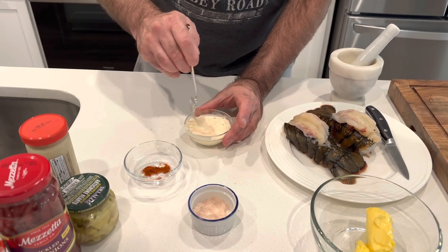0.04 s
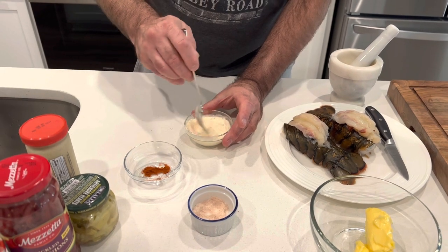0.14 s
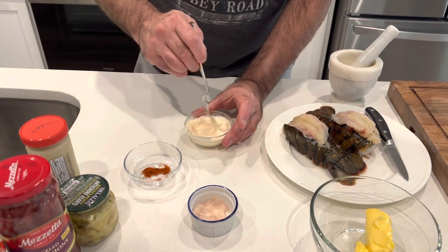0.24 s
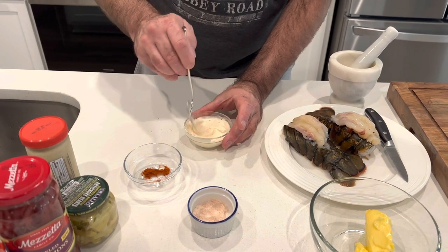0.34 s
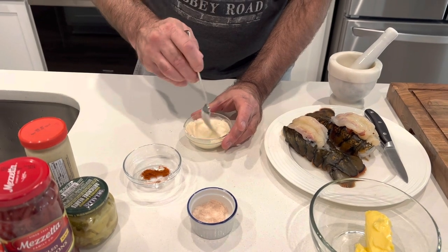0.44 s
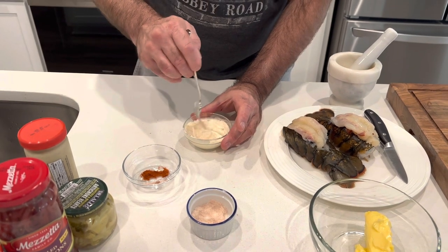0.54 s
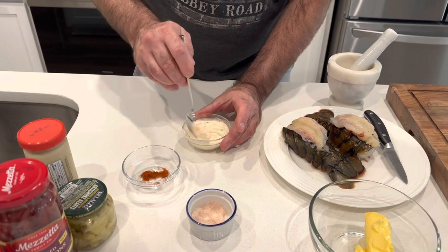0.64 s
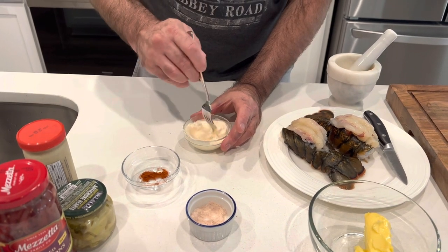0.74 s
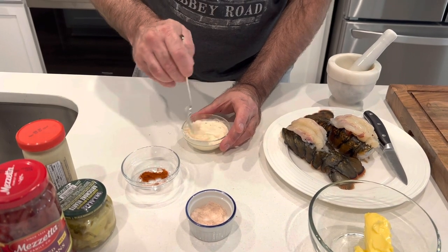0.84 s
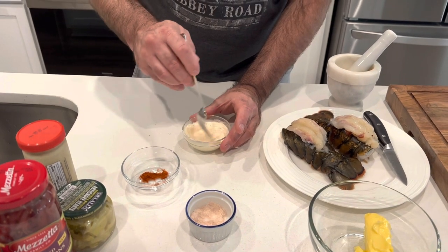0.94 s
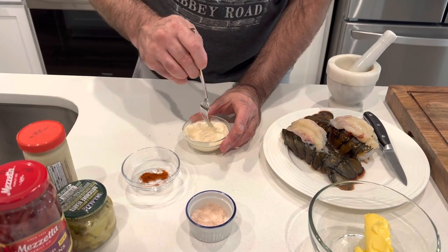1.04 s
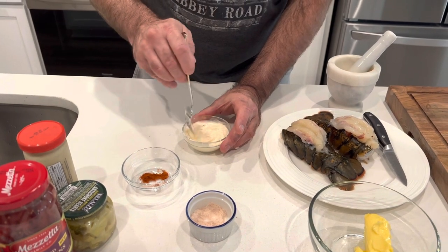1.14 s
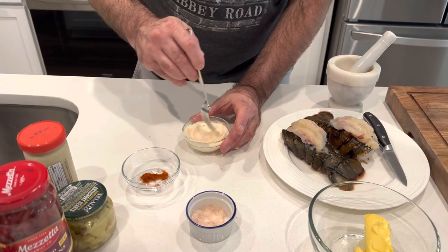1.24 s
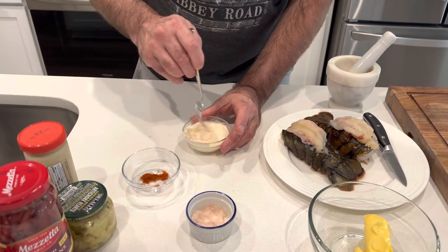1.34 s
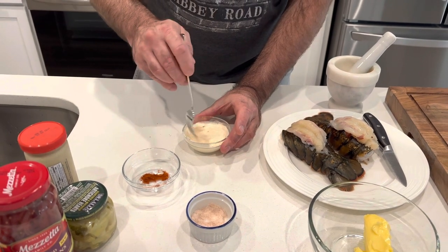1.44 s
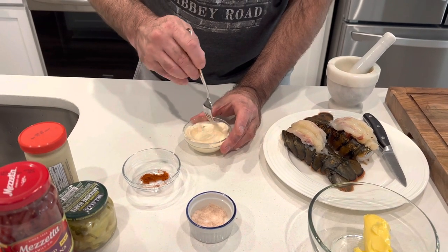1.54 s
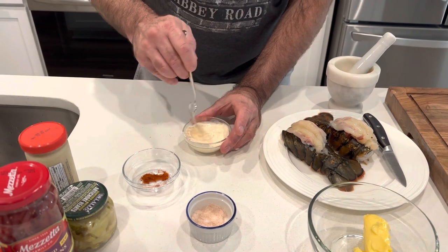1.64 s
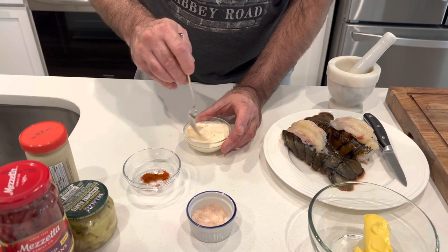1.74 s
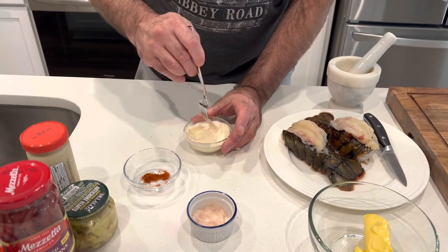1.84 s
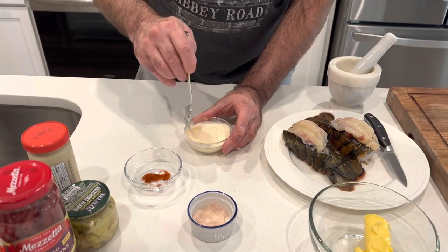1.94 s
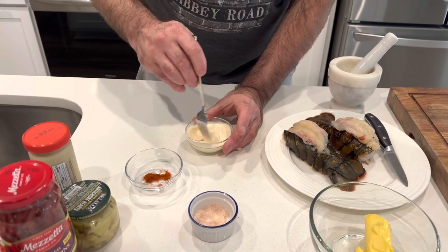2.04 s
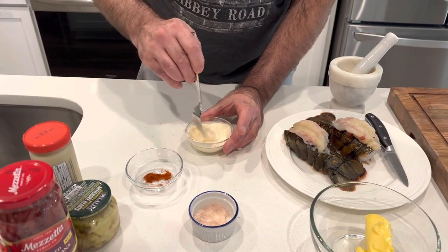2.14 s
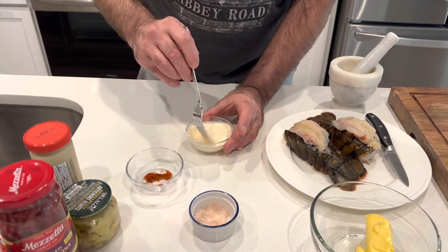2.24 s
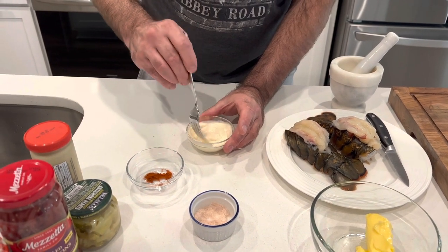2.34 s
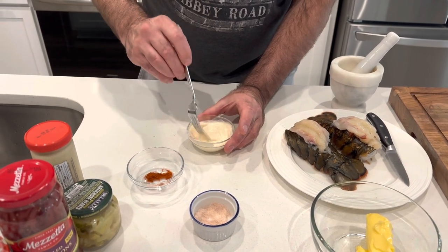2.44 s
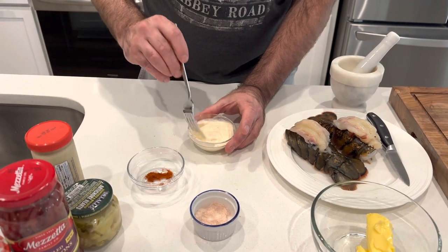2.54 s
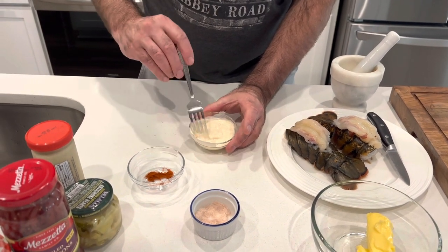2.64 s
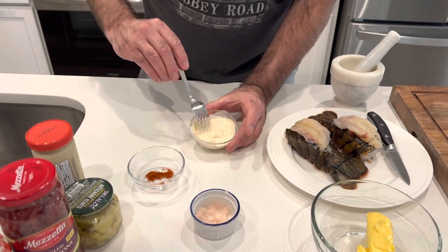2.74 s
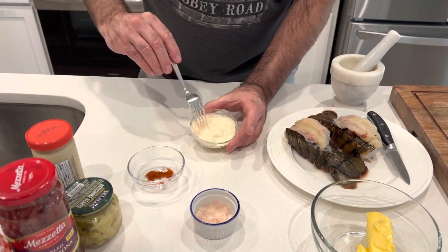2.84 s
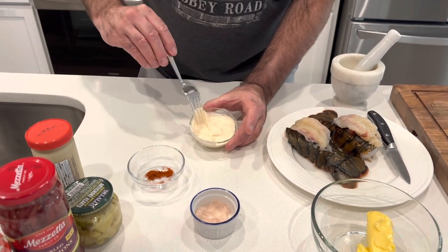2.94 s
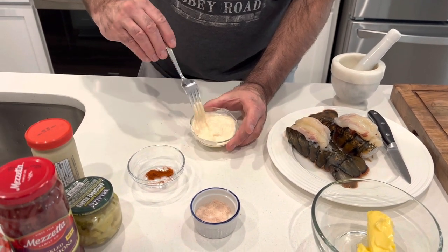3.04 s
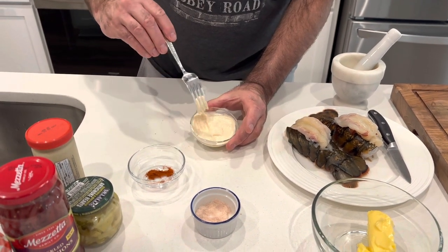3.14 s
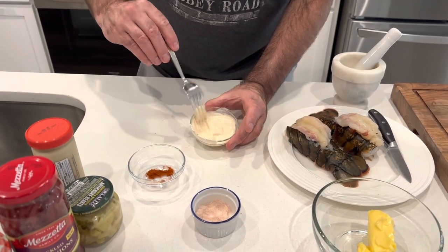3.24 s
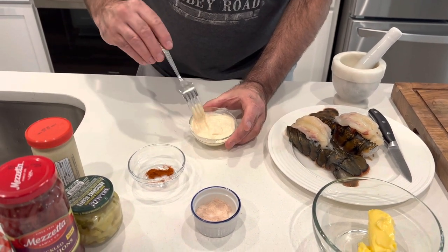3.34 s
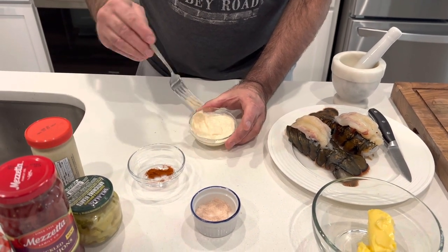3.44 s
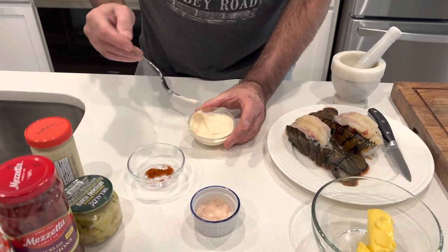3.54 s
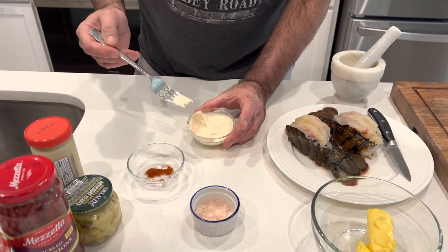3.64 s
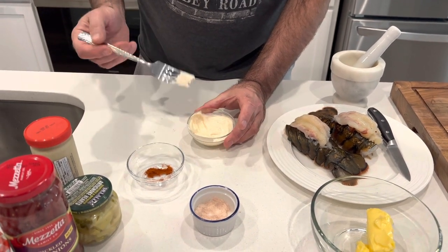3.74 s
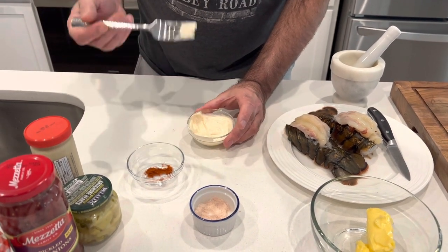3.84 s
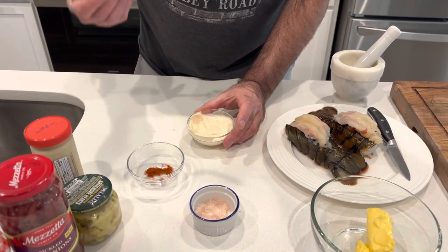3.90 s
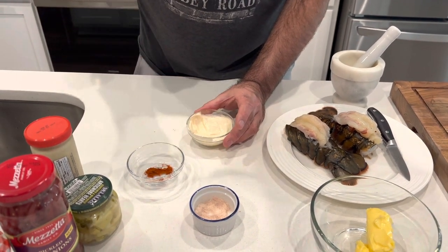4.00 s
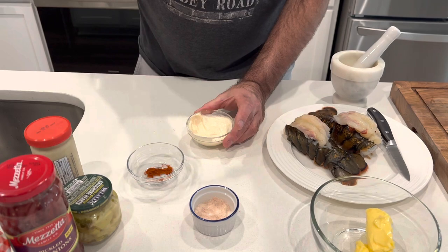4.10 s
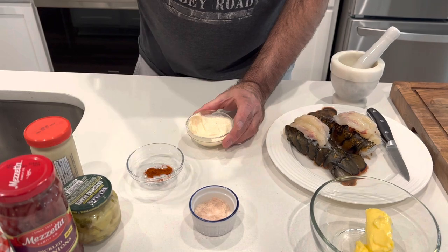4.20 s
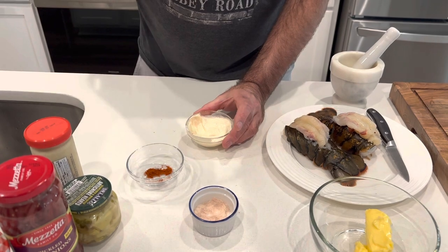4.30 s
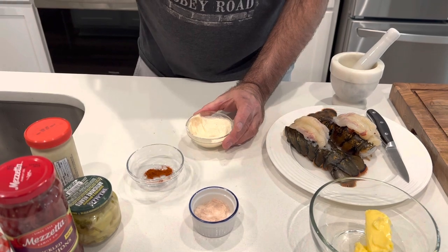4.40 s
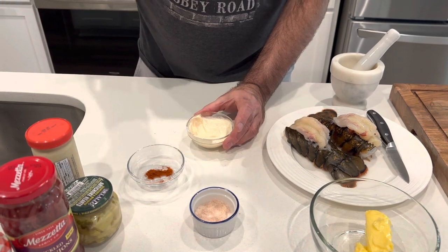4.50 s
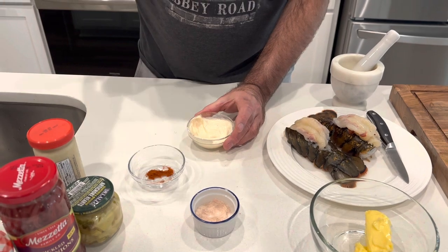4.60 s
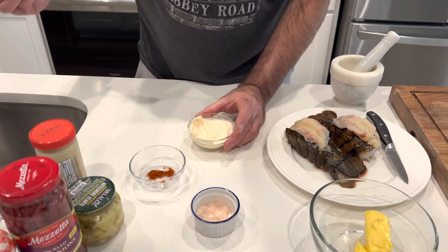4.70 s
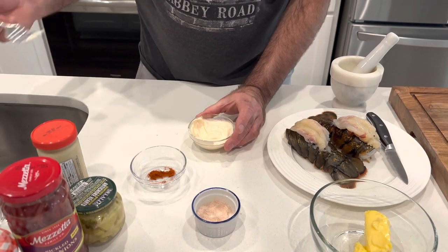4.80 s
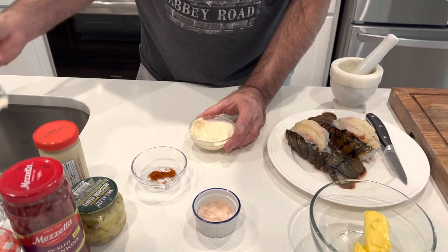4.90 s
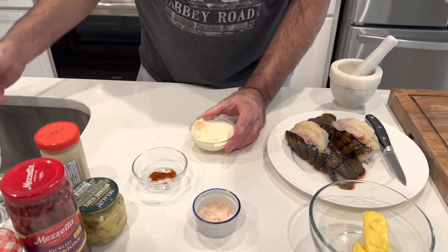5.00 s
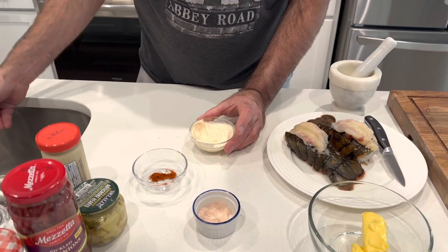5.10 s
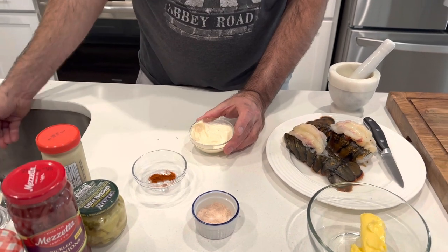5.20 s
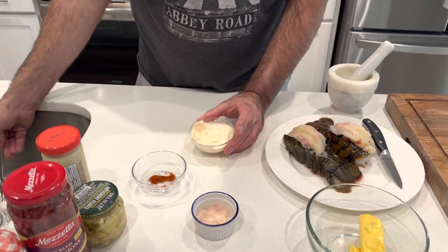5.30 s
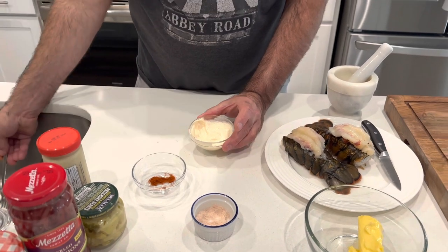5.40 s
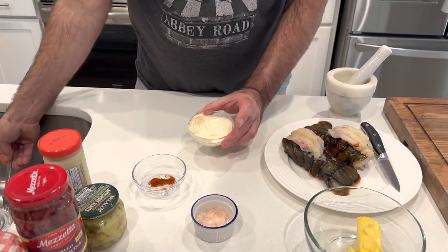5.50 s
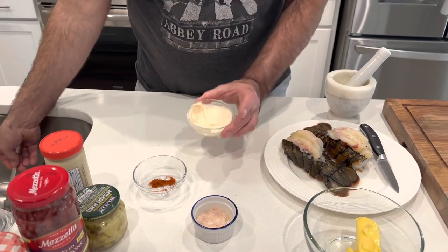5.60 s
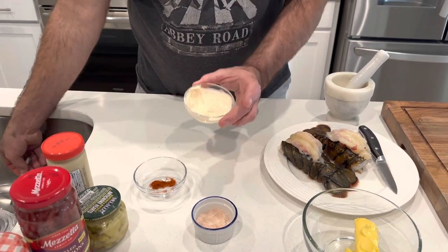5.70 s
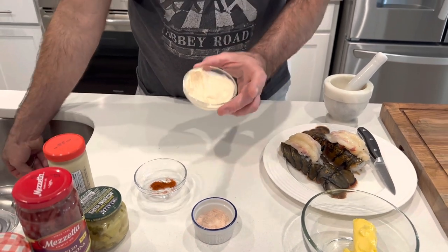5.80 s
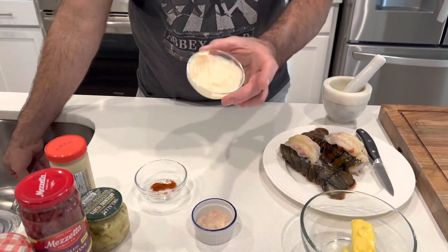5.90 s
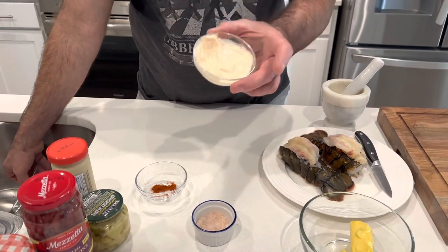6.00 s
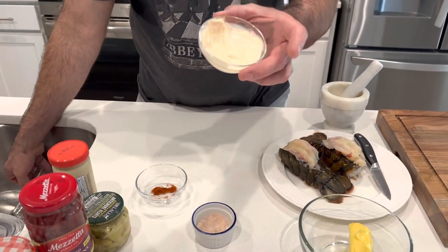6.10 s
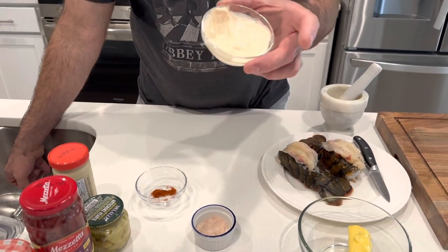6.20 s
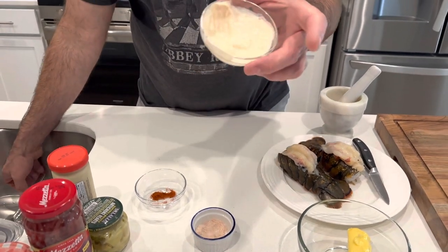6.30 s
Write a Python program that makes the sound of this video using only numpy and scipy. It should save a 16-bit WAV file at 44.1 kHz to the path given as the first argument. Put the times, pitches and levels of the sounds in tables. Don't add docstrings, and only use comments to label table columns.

```python
import sys
import numpy as np
from scipy import signal
from scipy.io import wavfile

SR = 44100
rng = np.random.default_rng(int(sys.argv[2]) if len(sys.argv) > 2 else 0)


def boost(x):
    u = np.asarray(x, float) / 20
    return 10 ** u


def wav_record(signal):
    frames = np.transpose(np.atleast_2d(signal))
    bounded = np.clip(frames, -1, 1)
    quanta = np.round(bounded * 32767).astype(np.int16)
    wavfile.write(sys.argv[1], SR, quanta)


N = 280035
LEAD = 4410
SPAN = N + LEAD
TIME_S = (np.arange(SPAN) - LEAD) / SR

# f/Hz, level/dB per Hz
TICK_COLOUR = [(2120, -31.5), (3600, -11), (4120, -1.5), (7030, -1.5), (7780, -4), (8400, -6), (9180, -4),
               (10400, -18.5), (15600, -18), (16500, -23)]


def rms_one(x):
    return x / np.sqrt(np.mean(x ** 2) + 1e-20)


def level_curve(rows):
    s, db = np.transpose(rows)
    return boost(np.interp(TIME_S, s, db, left=-120, right=-120))


def at_hz(points, hz, column=1):
    points = np.array(points)
    return np.interp(np.log(hz), np.log(points[:, 0]), points[:, column])


def clicks(s, db):
    out = np.full(SPAN, 1e-18)
    np.add.at(out, (np.asarray(s) * SR).round().astype(int) + LEAD, boost(db))
    return out


def ring(force, hz, t60):
    r, w = boost(-60 / (t60 * SR)), 2 * np.pi * hz / SR
    return signal.lfilter([0, np.sin(w)], [1, -2 * r * np.cos(w), r * r], force)


def strike(s, db, modes, spread_db):
    luck = rng.standard_normal((len(s), len(modes)))
    out = 0
    for k, (hz, mode_db, t60) in enumerate(modes):
        force = clicks(s, db(hz) + mode_db + spread_db * luck[:, k])
        out = out + (-1) ** k * ring(force, hz, t60)
    return out


def grains(per_s, spread_db):
    sizes = boost(spread_db * np.minimum(rng.exponential(1, SPAN), 4)) * rng.choice([-1, 1], SPAN)
    return rms_one(sizes * (rng.random(SPAN) < per_s / SR))


def bands(white, low_hz=0):
    edges_hz = 25 * 2 ** np.arange(0, 9.6, .5)
    for k, (low, high) in enumerate(zip(edges_hz, edges_hz[1:])):
        if low > low_hz:
            sos = signal.butter(2, [low, high], "band", fs=SR, output="sos")
            yield np.sqrt(low * high), signal.sosfilt(sos, white[k % 2])


def stereo(mid, side, likeness):
    likeness = np.clip(likeness, 0, 1)
    return np.sqrt(1 + likeness) * mid + np.sqrt(1 - likeness) * side * [[1], [-1]]


def bursts(s, db, t60, rise_hz):
    fade = signal.lfilter([1], [1, -boost(-60 / (t60 * SR))], clicks(s, db))
    swell = np.exp(-2 * np.pi * rise_hz / SR)
    return signal.lfilter([1 - swell], [1, -swell], fade) * rng.standard_normal((2, SPAN))


def colour(pair, spectrum, gain=lambda hz: 1):
    return sum(boost(at_hz(spectrum, hz)) * band * gain(hz) for hz, band in bands(pair, low_hz=300))


def held(s, db):
    latest = np.searchsorted(s, TIME_S + 40 / SR) - 1
    return boost(db)[np.maximum(latest, 0)]


def flutter(rate_hz, depth_db):
    sos = signal.butter(2, rate_hz, fs=SR, output="sos")
    return boost(depth_db * rms_one(signal.sosfilt(sos, rng.standard_normal(SPAN))))


def deaf_band(x):
    return signal.sosfilt(signal.butter(4, [10200, 13200], "bandstop", fs=SR, output="sos"), x)


def strokes():
    # t/s, tick/dB, knock/dB, glance/dB (how far a slanting blow spares deep and high modes), thump/dB
    stroke_rows = [(0.2037, -32, -35.5, 4, -51), (0.2182, -23, -24.5, 10.5, -48.5),
                   (0.399, -31, -41.5, 20, -58.5), (0.4843, -23, -23.5, 3, -46),
                   (0.6538, -32.5, -49, 22, -58), (0.7458, -26.5, -27, 5, -51), (0.928, -34, -45, 9, -56.5),
                   (1.0021, -22.5, -26, -1.5, -52.5), (1.0854, -63, -65, -6, -69),
                   (1.2785, -19, -23.5, 2.5, -52.5), (1.5454, -18, -23.5, 2, -51.5),
                   (1.7152, -51.5, -58, 13, -98), (1.8272, -22.5, -21, 0.5, -46.5),
                   (1.9996, -35, -42, 22, -50.5), (2.0997, -45, -57, 16, -54.5),
                   (2.2433, -81.5, -59.5, -1, -68), (2.3107, -30, -35.5, 15, -43),
                   (2.4897, -28, -39.5, -5.5, -49.5), (2.6645, -39.5, -52, -4.5, -59.5),
                   (2.8714, -36, -60.5, 3, -70), (2.9022, -41.5, -54.5, 11, -70.5),
                   (3.2668, -16.5, -39.5, -10, -57)]
    # tick/dB, knock/dB, glance/dB, thump/dB
    earlier_row = (-20.5, -26.5, 8, -42.5)
    # f/Hz, level/dB, t60/s
    bowl_modes = [(682.6, -5.5, 0.017), (778.3, 1.5, 0.053), (890, -5.5, 0.041), (1088.6, 4.5, 0.017),
                  (1080, 1, 0.028), (1284, -4.5, 0.054), (1432, -4, 0.018), (1422, -1, 0.066),
                  (1790, -0.5, 0.017), (1868, 0.5, 0.032), (2140, 4.5, 0.026), (2118, -4.5, 0.025),
                  (2603, -5, 0.054), (3146, -20, 0.0017)]
    # f/Hz, level/dB, t60/s
    bright_modes = [(4540, 0, 0.012), (6453, -11, 0.039), (8080, -6, 0.026), (9050, 3.5, 0.0047),
                    (15600, -17, 0.014)]
    # f/Hz, level/dB, t60/s
    counter_modes = [(130, 1.5, 0.045), (199.7, 3.5, 0.036), (255.5, 2.5, 0.054), (394.3, -10, 0.065),
                     (515, -5, 0.03)]
    # f/Hz, level/dB per Hz
    knock_colour = [(380, -36), (650, -6.5), (1180, 4), (1510, -6.5), (1930, 5), (3580, -15), (4450, -20.5),
                    (4800, -25.5), (6240, -60), (10600, -120)]

    s, tick_db, middle_db, glance_db, thump_db = np.transpose([(-.06, *earlier_row)] + list(stroke_rows))
    knock_db = [middle_db - 0.15 - glance_db, middle_db, middle_db + 2 - 0.44 * glance_db]
    register = lambda hz: int(hz > 1250) + int(hz > 2300)

    tick = colour(bursts(s, tick_db + 11.0, t60=0.0056, rise_hz=310), TICK_COLOUR)
    bright_rings = strike(s, lambda hz: tick_db - 6.5, bright_modes, spread_db=0.0)

    bowl = strike(s + 0.002555, lambda hz: knock_db[register(hz)] - 11.0, bowl_modes, spread_db=4.0)
    bowl = np.convolve(bowl, np.hanning(11) / 3)[:SPAN]

    force = [held(s, db) for db in knock_db]
    blow = clicks(s + 0.001986, 28 + 0 * s) * [[1], [-1]]
    puff = bursts(s + 0.0014, 6 + 0 * s, t60=0.049, rise_hz=200)
    clack = colour(blow + puff, knock_colour, lambda hz: force[register(hz)])

    thump = strike(s + 0.0057, lambda hz: thump_db + 0.5, counter_modes, spread_db=-1.0)
    return tick + bright_rings + bowl + clack + thump


def drag():
    # t/s, length/s, level/dB, fade/(dB/s)
    drag_rows = [
        (0.0, 2.08, -69, -2.3),
        (2.015, 0.82, -72, 7),
        (2.892, 0.19, -69, 33),
        (3.686, 0.29, -79.5, 32),
        (4.641, 0.41, -89.5, 9),
    ]
    # f/Hz, level/dB per Hz
    drag_colour = [(290, -41), (500, -7), (2230, -1.5), (3290, -15), (8210, -18), (10700, -37.5),
                   (11300, -55.5), (14700, -31), (16000, -43)]
    edge_s, turn_s, turn_db, turn_peak_s = 0.027, 0.24, 2, 1.51

    level = 0
    for s, length_s, db, fade in drag_rows:
        end_s, end_db = s + length_s, db - fade * length_s
        level = level + level_curve([(s - edge_s, db - 14), (s, db),
                                     (end_s, end_db), (end_s + edge_s, end_db - 17)])
    turn = boost(turn_db * np.cos(2 * np.pi * (TIME_S - turn_peak_s) / turn_s))
    wet = colour([grains(1000, spread_db=1.0), grains(1500, spread_db=6.5)], drag_colour)
    return level * turn * rms_one(deaf_band(wet))


def hum():
    # f/Hz, level/dB per Hz
    hum_colour = [(15, -49), (25, -15.5), (40, -15.5), (80, -4), (117, -3), (236, -19), (373, -22),
                  (591, -31), (659, -29.5), (714, -42.5), (1560, -38), (2000, -47.5), (5280, -50),
                  (14800, -62), (16000, -67.5)]
    # f/Hz, left-right likeness/1
    hum_likeness = [(60, 1), (240, 0.75), (950, 0.13), (3770, 0.041), (15000, 0.17)]
    out = 0
    for hz, (mid, side) in bands(rng.standard_normal((2, 2, SPAN))):
        out = out + boost(at_hz(hum_colour, hz)) * stereo(mid, side, at_hz(hum_likeness, hz))
    return boost(-57.5) * rms_one(out)


def smacks():
    # t/s, peak/dB, f/Hz, brightness/dB
    smack_rows = [(2.5073, -28, 1854, -13), (2.666, -42.5, 4330, -30), (2.873, -43.5, 1006, -24),
                  (2.903, -45.5, 1780, -29.5), (3.0234, -60, 1850, 9.5), (3.7267, -59.5, 1270, -33.5),
                  (3.7473, -53, 1460, -32.5), (3.74, -60, 2180, -20), (3.79, -57.5, 1500, -20),
                  (3.80, -65, 2200, -18), (3.7734, -59, 1294, -25.5), (3.8182, -57.5, 1550, -17),
                  (3.8414, -67.5, 1547, 2.5), (3.9194, -54, 1240, -7.5), (3.9715, -53.5, 1478, -32),
                  (4.0907, -65.5, 1370, -25), (4.313, -62, 1280, -26), (4.496, -68, 5100, -9.5),
                  (4.6424, -68.5, 2150, -19), (4.7044, -61.5, 2140, -28), (4.7167, -59, 2100, -22.5),
                  (4.72, -62, 1320, -18.5), (4.7845, -61, 2130, -14), (4.8, -62.5, 2700, -15),
                  (4.8194, -69, 2420, -6.5), (4.9307, -61.5, 5100, 7), (5.3342, -60, 2650, -24),
                  (5.3553, -59, 1670, -7)]
    pops = 0
    for s, peak_db, hz, _ in smack_rows:
        pops = pops + ring(clicks([s, s + 0.0059], [peak_db + 0.5, peak_db - 12.5]), hz, 0.017)
    s, peak_db, _, bright_db = np.transpose(smack_rows)
    crack = bursts(s, peak_db + bright_db + 12.5, t60=0.0065, rise_hz=404)
    return pops + colour(crack, TICK_COLOUR)


def rim_tap():
    # f/Hz, level/dB, t60/s
    rim_modes = [(793, -8, 0.014), (1135, -8, .02), (1650, -3, 0.0082), (2275, 0.5, 0.024),
                 (2480, -2.5, .02), (3130, 0, 0.0088), (3270, -8, .012), (4000, 3, .025), (6130, -3, 0.024),
                 (6820, -5.5, .02), (7900, 10, 0.021), (8770, 3, 0.014), (9020, -7.5, 0.016)]
    tap_s, tap_db = 3.2685, -31
    return sum((-1) ** k * ring(clicks([tap_s], [tap_db + db]), hz, t60)
               for k, (hz, db, t60) in enumerate(rim_modes))


def sink():
    # t/s, peak/dB, basin boom/dB, brightness/dB, low sheet modes/dB
    drop_rows = [(5.441, -39, -49, -18, -2.5), (5.4878, -30, -59, -40, -5), (5.5185, -50, -48, -8.5, 2),
                 (5.6558, -44, -67, -19, -4), (5.676, -51.5, -87, -4.5, -1), (5.7295, -61, -48, -8, -9),
                 (5.8059, -38.5, -61, -38.5, -4.5), (5.9392, -50, -59.5, -39, 4),
                 (5.9615, -41, -57.5, -25, -19), (5.9837, -46, -57.5, -36, -12),
                 (6.1213, -16, -45.5, -6, 4.5), (6.1329, -15.5, -43.5, -23, -0.5),
                 (6.153, -26.5, -56, -28.5, 4), (6.223, -32.5, -53.5, -20.5, 12.5),
                 (6.2689, -48, -54.5, -26.5, -5)]
    # peak t/s, peak/dB, swell/s, dying/s, scrape/dB
    rattle_rows = [
        (5.336, -63, 0.018, 0.2, -27),
        (5.438, -37, 0.006, 0.026, 1),
        (5.487, -44, 0.013, 0.16, -3),
        (5.678, -55.5, 0.091, 0.24, 10),
        (5.746, -57, 0.14, 0.095, 7),
        (5.978, -44, 0.062, 0.042, -18),
        (6.123, -37, 0.0093, 0.12, 7),
        (6.227, -44.5, 0.029, 0.053, 8),
    ]
    # f/Hz, level/dB, t60/s
    steel_modes = [(735, -20, .1), (1141, -15, .12), (1954, -3, .1), (2050, -4, .08), (2482, -1, .1),
                   (2553, -2, .1), (2606, 1, .12), (3935, -12, .1), (4323, -4, .2), (4540, -3, .07),
                   (4750, -1, .05), (5250, -4, .05), (5523, -6, .1), (5950, -5, .05), (6422, 0, .15),
                   (7500, -8, .05), (8839, -4, .14), (9157, -15, .06), (9803, -12, .05), (13560, -9, .07),
                   (14570, -10, .1)]
    # f/Hz, level/dB, t60/s
    basin_modes = [(113.4, -8.5, 0.82), (183.5, -2, 0.52), (254.3, -8, 0.21), (367, -4.5, 0.016)]
    # f/Hz, level/dB per Hz
    steel_colour = [(240, -50), (400, -20), (1130, -11.5), (1700, -18), (2550, -4.5), (3320, -23.5),
                    (4400, -3), (6590, -10.5), (7940, -34.5), (9130, -4.5), (11500, -7), (15000, -28),
                    (16500, -51)]

    s, peak_db, boom_db, bright_db, sheet_db = np.transpose(drop_rows)

    def blow_db(hz):
        return peak_db - 21.5 + (bright_db + 13.0) * (hz > 11000) + sheet_db * (1500 < hz < 3000)

    blows = sum(flutter(66, depth_db=6.5) * strike(s, blow_db, steel_modes[k::3], spread_db=6.0)
                for k in range(3))
    sparkle, sheet = held(s, bright_db + 19.5), held(s, sheet_db)
    crash = colour(bursts(s, peak_db, t60=0.036, rise_hz=501), steel_colour,
                   lambda hz: sparkle if hz > 11000 else sheet if 1500 < hz < 3000 else 1)
    boom = strike(s + 0.00744, lambda hz: boom_db, basin_modes, spread_db=1.5)

    range_db = 30
    level = sum(level_curve([(s - swell_s, db - range_db), (s, db), (s + dying_s, db - range_db)])
                for s, db, swell_s, dying_s, _ in rattle_rows)
    skid_s, *_, scrape_db = np.transpose(rattle_rows)
    scrape = held(skid_s - .02, scrape_db)
    sheen = held(skid_s - .02, -15 + 0.9 * scrape_db)
    tone = lambda hz: sheen if hz > 11000 else scrape if hz > 3600 else 1
    slide = np.array([grains(2000, spread_db=3.0), grains(2100, spread_db=3.0)]) * level
    shifts = [flutter(25, depth_db=7.0) for k in range(5)]
    rattle = 0
    for k, (hz, mode_db, t60) in enumerate(steel_modes):
        force = slide[k % 2] * boost(mode_db - 36.5) * tone(hz) * shifts[k % 5]
        rattle = rattle + ring(force, hz, 0.33 * t60)
    hiss = boost(10.0) * colour(slide, steel_colour, tone)
    return blows + crash + boom + rattle + hiss


def kitchen(x, pan_db, lag, wet_db):
    # f/Hz, t60/s, level/dB
    tail_rows = [(200, .45, -4.5), (700, 0.55, -6.5), (1500, 0.63, -11.5), (4230, 0.5, -13.5),
                 (8200, 0.5, -18.5), (15000, 0.21, 0)]
    # t/s, level/dB, pan/dB
    echo_rows = [
        (.0035, -10.5, 18),
        (.0085, -8, -12.5),
        (0.013, -5.5, 2.5),
    ]

    t, response = np.arange(SR) / SR, np.zeros((2, SR))
    for hz, (mid, side) in bands(rng.standard_normal((2, 2, SR))):
        tail = stereo(mid, side, .95 - 0.28 * np.log2(hz / 150))
        decay_db = -60 * t / at_hz(tail_rows, hz)
        response += tail * boost(at_hz(tail_rows, hz, column=2) + wet_db - 24 + decay_db)
    response *= 1 - np.exp(-(t / 0.001) ** 2)

    echoes, sides = np.zeros((2, SR)), np.array([.5, -.5])
    for s, echo_db, turn_db in echo_rows:
        echoes[:, round(s * SR)] = boost(echo_db + sides * (turn_db + pan_db))
    dull = signal.sosfilt(signal.butter(1, 3000, fs=SR, output="sos"), echoes)
    response = deaf_band(response + dull)
    response[:, 0] += boost(sides * pan_db)
    response[1] = np.interp(np.arange(SR) - lag, np.arange(SR), response[1], left=0)
    return signal.fftconvolve(x[None] if x.ndim == 1 else x[None], response, axes=1)[:, :SPAN] \
        if x.ndim == 1 else signal.fftconvolve(x, response, axes=1)[:, :SPAN]


def scene():
    bowl = kitchen(strokes() + rim_tap() + smacks() + drag(), pan_db=3.5, lag=4, wet_db=-0.5)
    steel = kitchen(sink(), pan_db=2.0, lag=7.3, wet_db=0.5)
    steel = deaf_band(steel) + boost(-19.5) * steel
    return (bowl + steel + hum())[:, LEAD:]


def band_limit(x):
    return signal.sosfilt(signal.butter(12, 17030, fs=SR, output="sos"), x)


def record(dry):
    mix = signal.sosfilt(signal.cheby2(10, 60, 17150, fs=SR, output="sos"), dry)
    mix = signal.sosfilt(signal.butter(2, 38, "high", fs=SR, output="sos"), mix)
    return band_limit(mix)


dry = scene()
out = record(dry)
wav_record(out)
```